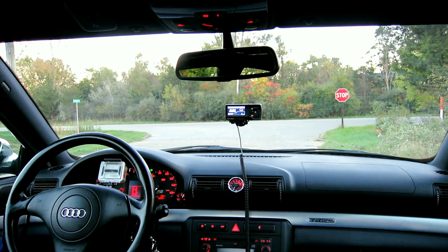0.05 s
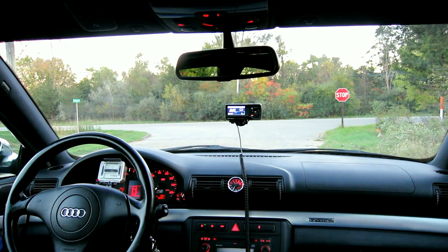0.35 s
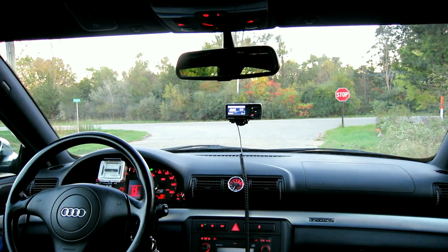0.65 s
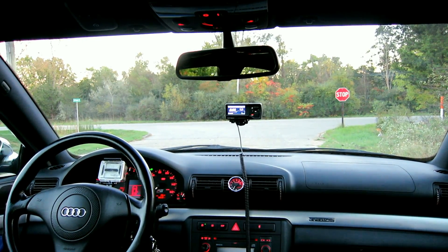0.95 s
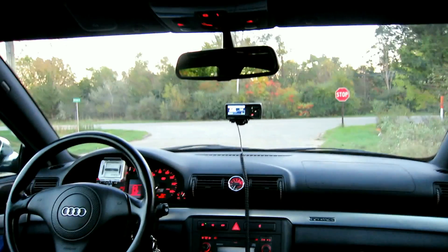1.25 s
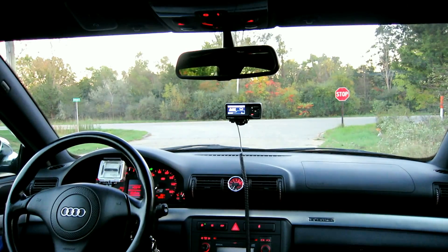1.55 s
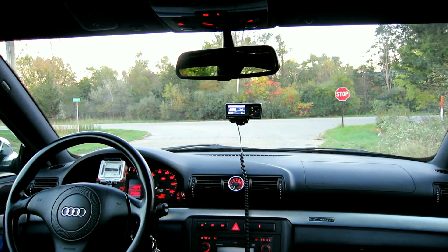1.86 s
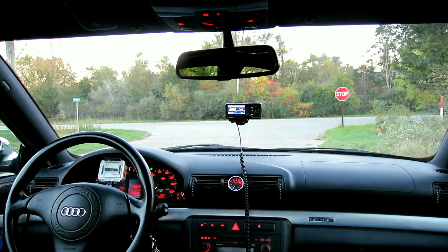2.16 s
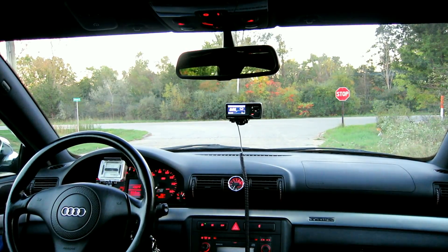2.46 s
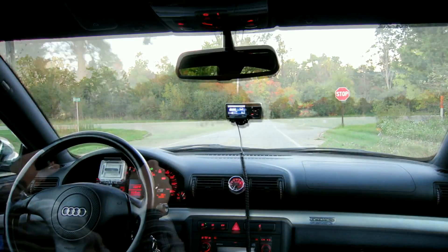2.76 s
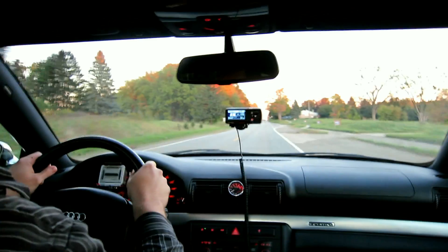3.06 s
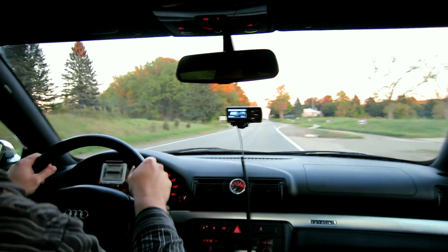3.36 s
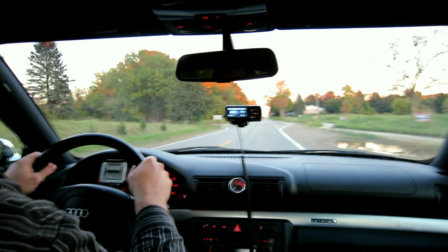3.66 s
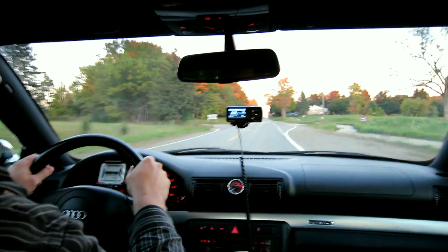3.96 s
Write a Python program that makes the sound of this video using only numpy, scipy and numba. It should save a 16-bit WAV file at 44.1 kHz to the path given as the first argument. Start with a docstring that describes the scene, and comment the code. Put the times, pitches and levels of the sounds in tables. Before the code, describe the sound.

Car noise from a microphone in the cabin: a low idle hum and steady indicator clicks, then a door slam that briefly dips the level. Suddenly the car is driving, with road rumble and something loose ticking.

```python
"""A car cabin, parked and moving

The engine idles, the indicator relay ticks, trim rattles, and a door is pulled shut. The slam makes
an automatic gain control duck, and the gain creeps back up. Then an abrupt cut to the same cabin
on the road: tyre roar, engine drone, the sharp ticks of something loose, creaks and thuds."""
import sys
import numpy as np
from scipy import signal
from scipy.fft import rfft, irfft
from scipy.io import wavfile
from numba import njit

SR = 44100
rng = np.random.default_rng(int(sys.argv[2]) if len(sys.argv) > 2 else 0)


def master_out(mix):
    """Clip the mix to full scale and print it as 16-bit PCM to the path in sys.argv[1]."""
    frames = np.transpose(np.atleast_2d(mix))
    ceiling = np.clip(frames, -1, 1)
    pcm = np.round(ceiling * 32767).astype(np.int16)
    wavfile.write(sys.argv[1], SR, pcm)


N = 176400
T = np.arange(N) / SR
SHUT_S, CUT_S = 1.3, 2.657

# Crankshaft speed. Each row: time in seconds, turns per second.
CRANK_SPEED = [(0, 20.1), (.3, 19.92), (1.1, 19.9), (1.3, 20.04), (2.65, 20.02)]
# Harmonics of the idle. Each row: multiple of the crank speed, relative level in dB.
IDLE_ORDERS = [(2, -18.5), (3, -33.5), (4, 2.5), (5, -1.5), (6, 5), (7, -18), (8, -15.5), (9, -12),
               (10, -14), (11, -13), (12, -29), (14, -32.5)]
# Resonances of the cabin air. Each row: frequency in Hz, bandwidth in Hz.
CABIN_MODES = [(90, 2.9), (190, 35)]
# The door's knocks, swing and latch. Each row: time in seconds, level in dB, attack in seconds,
# time to decay by 60 dB (T60) in seconds, spectral tilt in dB per octave.
DOOR_HITS = [(.222, -33.5, 0.0056, 0.095, 6), (.682, -21.5, 0.0016, 0.086, 1),
             (.685, -19, 0.0034, 0.091, -2.5), (1.003, -13, 0.0041, 0.092, -3),
             (1.011, -13.5, 0.0034, .08, -4), (1.035, -20.5, 0.0025, 0.06, -8),
             (1.168, -12.5, 0.0097, 0.08, 0.5), (1.178, -1.5, 0.0018, .06, 0.5),
             (1.182, -2.5, .001, 0.053, 0), (1.204, -0.5, 0.0034, 0.12, 0), (1.25, -24, .01, 0.36, -0.5)]
# Modes of door panel and car body. Each row: frequency in Hz, relative level in dB, T60 in seconds.
PANEL_MODES = [(200, -9.5, 0.11), (400, -13, .12), (637, -12.5, 0.1), (970, -17.5, .09)]
BODY_MODES = [(87.5, 25, 0.099), (66, 7.5, 0.22), (131, 11.5, .15), (30, -7, 0.9)]
# Strength of the tyre roar. Each row: time in seconds, bass level in dB, treble level in dB.
ROAR_LEVELS = [(2.66, -14.5, -28), (2.78, -15, -29.5), (2.84, -18.5, -30.5), (3.3, -18, -29.5),
               (3.6, -16, -28), (4, -16.5, -28.5)]
# Engine orders, tyre cavity and drivetrain tones. Each row: frequency in Hz, level at the cut in dB,
# level at the end in dB, roughness from 0 to 1.
DRONE_TONES = [(88.7, -26.5, -33, 0.05), (183.4, -30.5, -20, 0), (236.2, -23.5, -23, 0.67),
               (276, -31, -40, 0.07), (363.4, -35, -33, 0.63), (420.3, -40.5, -29, 0.1),
               (942, -45, -39.5, .9)]

# Brief sounds of trim, a loose part and tyres. Each row: time in seconds, relative level in dB.
RATTLES = [(.305, -32.5), (0.332, -32), (.357, -29.5), (.378, -27), (.41, -23.5), (.459, -28), (.533, -26),
           (1.329, -20), (1.378, -21), (1.429, -26.5), (1.458, -31), (1.483, -26.5), (1.532, -28),
           (1.558, -32), (1.581, -26.5), (1.608, -29), (1.639, -28.5), (1.667, -36), (1.698, -34),
           (1.799, -33.5), (2.05, -34), (2.174, -33.5), (2.2, -35), (2.354, -34), (2.382, -35),
           (2.477, -26.5), (2.631, -32.5)]
TICKS = [(2.6893, -25.5), (2.7568, -23), (2.81, -28), (2.826, -27), (3.0335, -21.5), (3.4017, -16),
         (3.5758, -15.5), (3.6406, -21), (3.692, -20), (3.7537, -22), (3.8102, -25.5), (3.856, -14),
         (3.9694, -17.5)]
CREAKS = [(2.744, -37), (3.18, -34), (3.197, -36), (3.249, -43), (3.62, -47), (3.791, -43)]
BUMPS = [(2.785, -11), (2.945, -15), (3.703, -14.5)]

# Noise spectra of the sources. Each row: frequency in Hz, relative spectral density in dB.
OPEN_AIR_SPECTRUM = [(20, -11), (55, -3.5), (180, 5), (300, -8.5), (420, -8.5), (600, -16), (1200, -24.5),
                     (2000, -30), (3200, -37.5), (7000, -42), (12000, -47.5), (16000, -63.5)]
SHUT_AIR_SPECTRUM = [(20, -1.5), (55, 1.5), (200, 3.5), (400, -4.5), (550, -11), (1200, -22.5), (1800, -31),
                     (3200, -37.5), (7000, -41.5), (12000, -47.5), (16000, -63)]
DOOR_SPECTRUM = [(40, -10.5), (120, -3.5), (280, 2), (430, -1), (630, -1.5), (800, -11.5), (1000, -6.5),
                 (1500, -12), (2300, -11), (4000, -21), (7000, -32), (12000, -45.5), (16000, -59.5)]
RELAY_CLOSE_SPECTRUM = [(530, -45), (900, -11), (1130, 1), (1850, -16), (2270, -0.5), (2540, -23),
                        (2890, -14), (3150, -17), (4570, -16), (5220, -13.5), (11800, -25), (12900, -19),
                        (16000, -53.5)]
RELAY_OPEN_SPECTRUM = [(880, -37), (1500, -14.5), (1870, -14), (2270, 3), (3150, -7), (4920, 2),
                       (6430, -9.5), (10500, -8.5), (13100, -14), (16000, -35)]
RATTLE_SPECTRUM = [(200, 8), (700, 6), (1700, -1.5), (2600, -10.5), (4200, -20.5), (7000, -29.5),
                   (16000, -50)]
CLICK_SPECTRUM = [(100, 3), (600, -1), (3000, -15), (16000, -26)]
ROAR_SPECTRUM = [(15, -51), (25, -26), (84, 2), (153, -0.5), (185, -2.5), (206, -5), (242, -2), (384, -8.5),
                 (416, -9.5), (516, -15), (936, -20), (1480, -27), (4030, -40), (6050, -53), (7510, -55),
                 (11600, -64.5), (16000, -79)]
TICK_SPECTRUM = [(2000, -17), (3500, -8), (4000, 4), (4700, -1), (5300, 1.5), (6000, -9), (7600, -5),
                 (8500, -19), (12000, -25.5), (16000, -42)]
CREAK_SPECTRUM = [(2000, 2), (5000, 3), (11000, -6), (14500, -18), (16000, -20)]
BUMP_SPECTRUM = [(50, -9), (120, 0), (320, -3), (600, -24), (3000, -52), (16000, -90)]

# Stereo width of blows and road noise, and of the diffuse sound while parked.
# Each row: frequency in Hz, side level minus mid level in dB.
WIDTH = [(30, -18.5), (110, -17.5), (200, -15.5), (380, -17.5), (700, -16), (1300, -8), (2400, -7.5),
         (4400, -5.5), (8000, -3), (16000, 2.5)]
DIFFUSE_WIDTH = [(30, -15.5), (200, -11.5), (380, -8), (700, -6.5), (1300, 0), (2400, -3.5), (8000, -1.5),
                 (16000, 1.5)]


def amp(db):
    """Amplitude grows tenfold for every 20 dB."""
    return 10 ** (np.asarray(db) / 20)


def curve(table, column=1):
    """Linear interpolation in time turns a table column into a continuous control."""
    rows = np.array(table)
    return np.interp(T, rows[:, 0], rows[:, column])


def db_at(spectrum, hz):
    """A spectrum's level is interpolated along a logarithmic frequency axis."""
    rows = np.array(spectrum)
    return np.interp(np.log(hz), np.log(rows[:, 0]), rows[:, 1])


def noise(spectrum, tilt_db=0, width=WIDTH, size=N):
    """The sum and difference of independent filtered noises form a stereo pair of unit rms."""
    hz = np.maximum(np.fft.rfftfreq(size, 1 / SR), 1)
    bass_rolloff = np.minimum(hz / spectrum[0][0], 1) ** 2
    gain = amp(db_at(spectrum, hz) + tilt_db * np.log2(hz)) * bass_rolloff
    white = rfft(rng.standard_normal((2, size)))
    mid, side = irfft(white * np.array([gain, gain * amp(db_at(width, hz))]), size)
    pair = np.array([mid + side, mid - side])
    return pair / pair.std()


def drift(rate_hz):
    """Low-passed noise wanders smoothly, with unit standard deviation."""
    lowpass = np.exp(-(np.fft.rfftfreq(N, 1 / SR) / rate_hz) ** 2)
    wander = irfft(rfft(rng.standard_normal(N)) * lowpass, N)
    return wander / wander.std()


def burst(peak_s, db, spectrum, t60, attack=.0005, tilt_db=0, width=WIDTH):
    """The dense modes of a struck part merge into noise that swells and decays exponentially."""
    size = 16384
    start = max(int(peak_s * SR) - size // 4, 0)
    age = T[start:start + size] - peak_s
    envelope = np.exp(np.minimum(age / attack, -np.log(1000) * age / t60))
    out = np.zeros((2, N))
    out[:, start:start + size] = amp(db) * envelope * noise(spectrum, tilt_db, width, size)[:, :len(age)]
    return out


def mode(age, hz, db, t60):
    """A damped resonator vibrates freely as an exponentially decaying sinusoid."""
    return amp(db) * np.sin(2 * np.pi * hz * age) * np.exp(-np.log(1000) * age / t60)


def idle():
    """Crank harmonics boom through cabin modes over pulsing air noise; the shut door muffles both."""
    speed = curve(CRANK_SPEED)
    crank_angle = 2 * np.pi * np.cumsum(speed * (1 + .0022 * drift(5.4))) / SR
    boom = 0
    for order, db in IDLE_ORDERS:
        # Each mode delays the harmonics above it by up to half a cycle.
        lag = sum(np.arctan2(bandwidth / 2, hz - order * speed.mean()) for hz, bandwidth in CABIN_MODES)
        boom -= amp(db) * np.cos(order * crank_angle - lag)
    shut = np.clip((T - SHUT_S) / .04 + .5, 0, 1)
    boom *= amp(-13.5 - 3.5 * shut) / boom.std()
    air = (1 - shut) * amp(-24.5) * noise(OPEN_AIR_SPECTRUM, width=DIFFUSE_WIDTH)
    air += shut * amp(-29.5) * noise(SHUT_AIR_SPECTRUM, width=DIFFUSE_WIDTH)
    low_air = signal.sosfilt(signal.butter(2, 2500, fs=SR, output="sos"), air)
    return boom + air + .24 * np.cos(2 * crank_angle) * low_air


def whine(hz=7000, db=-67):
    """Random modulation spreads a faint, high tone into a narrow band of hiss."""
    modulation = drift(120) + 1j * drift(120)
    return amp(db) * np.real(modulation * np.exp(2j * np.pi * hz * T))


def door(seat_s=1.198, rise_s=.0097):
    """Impacts at the stops and latch excite the panel's modes; the body booms as the door seats."""
    knocks = 0
    for start, db, attack, t60, tilt_db in DOOR_HITS:
        knocks += burst(start, db, DOOR_SPECTRUM, t60, attack, tilt_db)
        age = np.maximum(T - start, 0)
        for hz, mode_db, mode_t60 in PANEL_MODES:
            octaves = np.log2(hz / PANEL_MODES[-1][0])
            knocks += mode(age, hz, db + mode_db + tilt_db * octaves, mode_t60)
    age = np.maximum(T - seat_s, 0)
    boom = sum(mode(age, hz, db, t60) for hz, db, t60 in BODY_MODES)
    return knocks + boom * (1 - np.exp(-(age / rise_s) ** 2))


def indicator(first_s=.2605, period_s=.7294, closed_s=.3435):
    """A relay strikes on closing and on opening; its spring rings high, longer on closing."""
    spring_hz, step_hz, spring_db = 13050, 500, -46
    spring_band = [(spring_hz + k * step_hz, db) for k, db in enumerate([-50, -4, 0, -6, -50], -2)]
    out = 0
    for closes in np.arange(first_s, CUT_S, period_s):
        opens = closes + closed_s
        out += burst(closes + .0006, -28, RELAY_CLOSE_SPECTRUM, t60=.075)
        out += burst(closes + .001, spring_db, spring_band, t60=.07)
        out += burst(opens + .001, -32.5, RELAY_OPEN_SPECTRUM, t60=.075)
        out += burst(opens + .001, spring_db + 2, spring_band, t60=.04)
    return out


def trim_rattles():
    """Forced vibration at idle makes the trim chatter in short runs of impacts."""
    return sum(burst(s, db, RATTLE_SPECTRUM, t60=.03, width=DIFFUSE_WIDTH) for s, db in RATTLES)


def cut_click():
    """A very brief transient has a broad spectrum and is heard as a click."""
    return burst(CUT_S + .001, -14, CLICK_SPECTRUM, t60=.0031, attack=.0001)


def tyre_roar(split_hz=654):
    """Rolling contact radiates rumble and hiss, each fluttering with the road surface."""
    roar = noise(ROAR_SPECTRUM)
    bass = signal.sosfiltfilt(signal.butter(2, split_hz, fs=SR, output="sos"), roar)
    treble = roar - bass
    bass_db = curve(ROAR_LEVELS) + .3 * drift(22)
    treble_db = curve(ROAR_LEVELS, column=2) + 1.06 * drift(40)
    return bass / bass.std() * amp(bass_db) + treble / treble.std() * amp(treble_db)


def drone():
    """Tones of engine, tyres and drivetrain waver under random amplitude and phase modulation."""
    out = 0
    for hz, first_db, last_db, roughness in DRONE_TONES:
        modulation = 1 + roughness * (drift(16) + 1j * drift(18))
        tone = np.real(modulation * np.exp(2j * np.pi * (hz * T + rng.random())))
        level_db = np.interp(T, [CUT_S, T[-1]], [first_db, last_db])
        out += tone / tone.std() * amp(level_db)
    return out


def loose_ticks():
    """Short, heavily damped impacts of a loose part give sharp, bright ticks."""
    return sum(burst(s + .001, db - 4, TICK_SPECTRUM, t60=.0095, attack=.00023) for s, db in TICKS)


def trim_creaks():
    """Plastic trim creaks in soft bursts of quickly damped, high-frequency vibration."""
    return sum(burst(s, db, CREAK_SPECTRUM, t60=.038) for s, db in CREAKS)


def tyre_thuds():
    """Uneven tarmac gives the tyres slow blows, whose energy lies at low frequencies."""
    return sum(burst(s, db, BUMP_SPECTRUM, t60=.08, attack=.017) for s, db in BUMPS)


def scene():
    """Sources add by superposition: first in the parked car, then, after a click, in the moving one."""
    parked = idle() + whine() + door() + indicator() + trim_rattles()
    parked *= amp(np.array([[-.4], [.4]]) / 2)  # slightly to the right
    moving = tyre_roar() + drone() + loose_ticks() + trim_creaks() + tyre_thuds()
    return np.where(T < CUT_S, parked, moving) + cut_click()


@njit
def gain_reduction(overload_db, initial_db=3., attack_s=.0015, recovery_db_per_s=5.5):
    """A gain control's reduction, in dB, follows overload quickly and recovers at a steady rate."""
    out, held_db = np.empty(len(overload_db)), initial_db
    for i in range(len(overload_db)):
        if overload_db[i] > held_db:
            held_db += (overload_db[i] - held_db) / (attack_s * SR)
        held_db = max(held_db - recovery_db_per_s / SR, 0.)
        out[i] = held_db
    return out


def record(dry):
    """Gain control compresses the parked scene; all sound is then clipped and low-pass filtered."""
    threshold_db, cutoff_hz = -8, 15800
    level_db = 20 * np.log10(np.abs(dry.mean(axis=0)) + 1e-9)
    duck_db = gain_reduction(level_db - threshold_db) * (T < CUT_S)
    clipped = np.clip(dry * amp(-duck_db), -1, 1)
    return signal.sosfilt(signal.ellip(8, .2, 70, cutoff_hz, fs=SR, output="sos"), clipped)


dry = scene()
out = record(dry)
master_out(out)
```